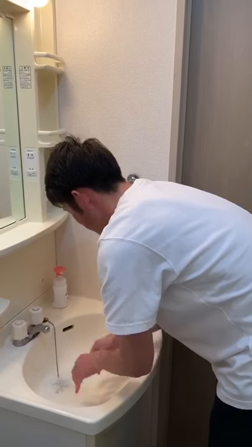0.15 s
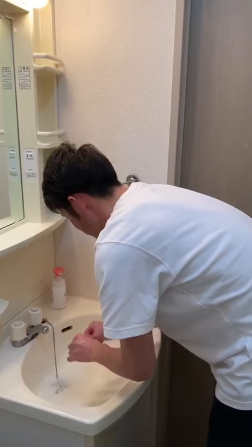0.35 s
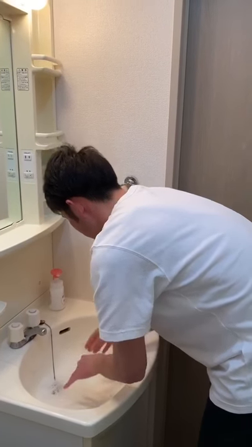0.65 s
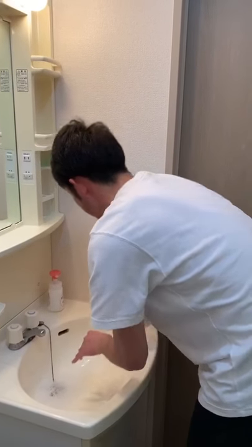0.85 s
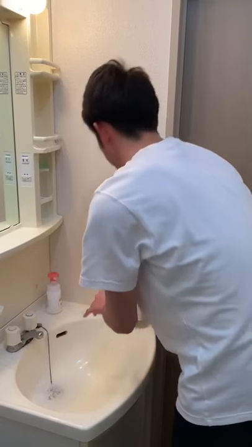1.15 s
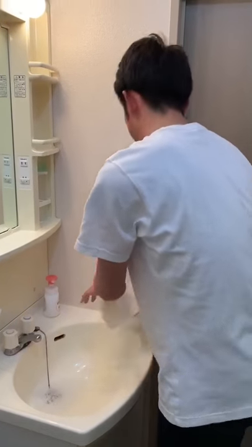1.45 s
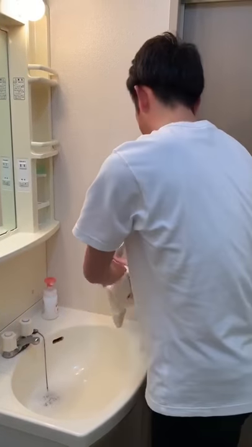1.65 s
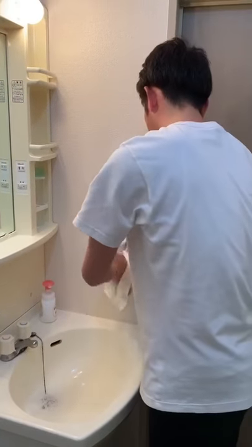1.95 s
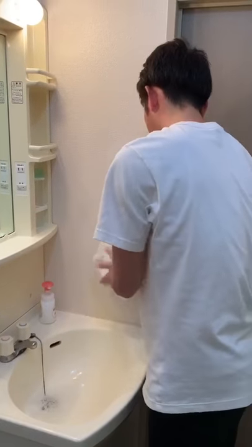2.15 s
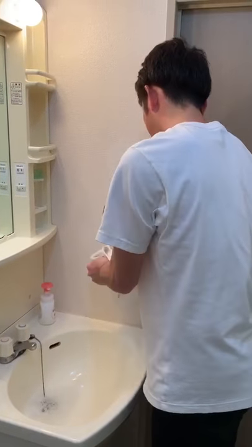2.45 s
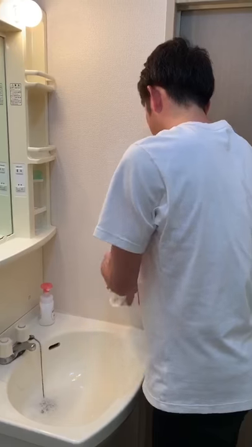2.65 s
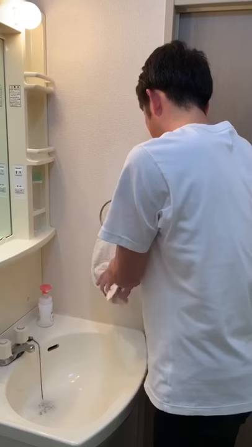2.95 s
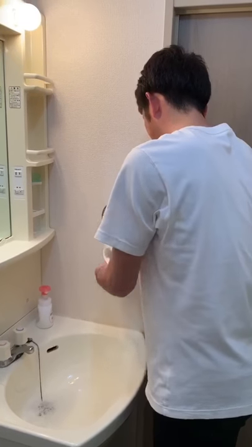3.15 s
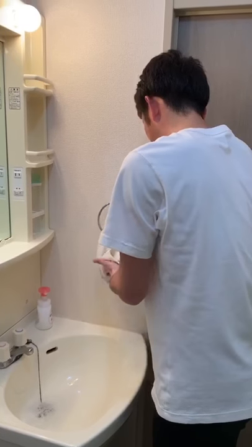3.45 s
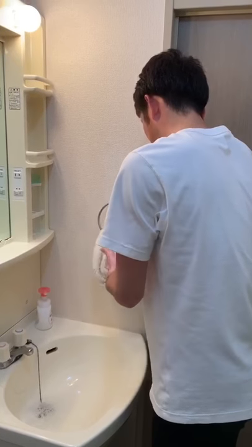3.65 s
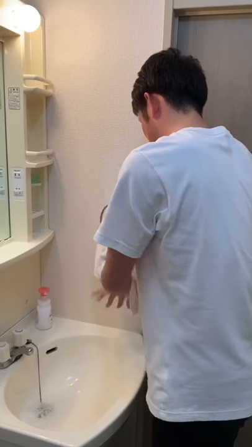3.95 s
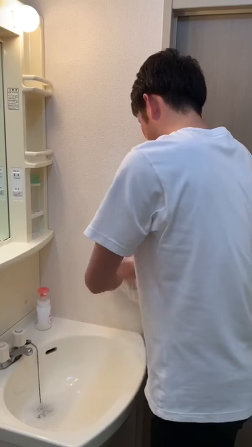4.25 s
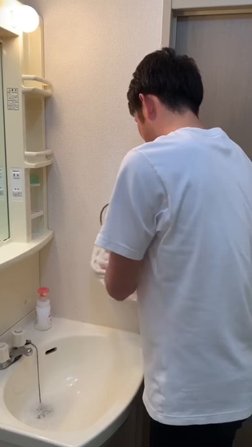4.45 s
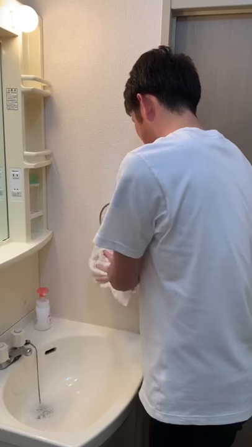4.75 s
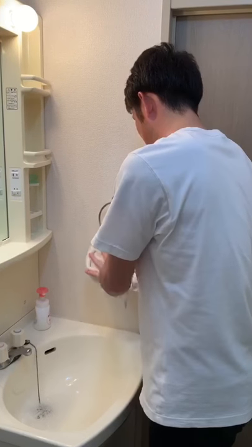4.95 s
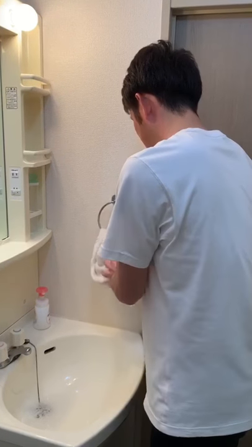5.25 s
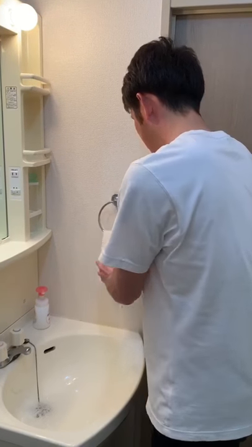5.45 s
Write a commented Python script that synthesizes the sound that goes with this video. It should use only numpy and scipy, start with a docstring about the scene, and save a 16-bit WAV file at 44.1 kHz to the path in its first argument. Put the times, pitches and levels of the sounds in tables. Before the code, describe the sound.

Close stereo pickup of hand drying: drumming drops and spray on a washbasin during the first second, a couple of small drips, then a sharp pat and ringing double clack as the towel is pulled. Irregular muffled flaps, rubs and light brushing follow to the end, with dull booms and small squeaks from the ring, in short bathroom echo over faint low room air.

```python
"""Wet hands and a towel

Wet hands are shaken over a hollow washbasin in a small bathroom, then dried on a towel.
Drops excite the damped modes of the bowl, and spray hisses over it as coloured random clicks.
The towel is pulled from its ring, which knocks on the wall: clusters of close modes that beat.
Hands pat and rub the cloth (shaped bursts of noise) amid soft low thumps (damped sines) and still air."""
import sys
import numpy as np
from scipy import signal
from scipy.fft import rfft, irfft
from scipy.io import wavfile
from scipy.ndimage import uniform_filter1d

SR = 44100
rng = np.random.default_rng(int(sys.argv[2]) if len(sys.argv) > 2 else 0)


def digitize_waveform(pressure):
    """Quantize a signal to 16-bit integers and store it at the path in sys.argv[1].

    Rows of a 2-D input are taken as channels; values are limited to [-1, 1].
    """
    field = np.atleast_2d(pressure).T
    bounded = np.clip(field, -1, 1)
    quanta = np.round(bounded * 32767).astype(np.int16)
    wavfile.write(sys.argv[1], SR, quanta)


N = 247842
TIME, HZ = np.arange(N) / SR, np.fft.rfftfreq(N, 1 / SR)
AGE = TIME[:SR // 2]  # time since the start of a short sound, in s

# Spectrum of the still air: pitch_hz, level_db
AIR_COLOUR = [(20, -1.5), (50, 30.5), (80, 26), (190, 20.5), (300, 10.5), (500, 1), (1000, 3), (2000, 0.5),
              (4000, -2), (8000, -3), (12000, -2.5), (14200, -0.5), (14800, -24)]
AIR_DB = -72.5

# Fine spray flicked off the fingers: start_s, rise_s, level_db, fade_db_per_s
FLICKS = [(0.05, 0.043, -64, 272), (.46, 0.032, -56, 327)]
FLICK_START_DB = -9.5  # against the full swell
# Spectrum of the spray: pitch_hz, level_db
SPRAY_COLOUR = [(150, -3.5), (500, -8), (1100, -4), (1800, -2), (3000, -5.5), (5000, -5.5), (7500, -8),
                (9000, -8.5), (11500, -0.5), (14000, 5), (15000, -9)]

# Single drops landing on the bowl: start_s, level_db, hardness_db (on the high modes and the splat)
DROPS = [(.073, -47, 6.5), (0.088, -43.5, 3), (0.106, -37, 2.5), (0.153, -48, .5), (0.181, -50.5, 13),
         (.195, -41.5, 5.5), (0.214, -41, -10), (0.982, -48, 0), (1.002, -44, 5.5), (1.022, -51, 9.5)]
# Showers of further drops shed by each shake: start_s, end_s, mid_level_db, hardness_db
SHAKES = [(0.119, 0.234, -46.5, 6.5), (0.917, 1.074, -48.5, 1.5)]
DROP_GAP_S, SHOWER_EDGE_DB = .019, -4.5
# Modes of the hollow bowl: pitch_hz, level_db, t60_s
BOWL_MODES = [(82.4, 5.5, 0.19), (177.8, 6.5, 0.094), (221, -8, 0.14), (297, -16.5, 0.22), (376, -20, 0.14),
              (559, -11, 0.13), (663, -19.5, 0.14), (871, -19.5, 0.13), (1000, -15, 0.19),
              (1330, -14, 0.086), (1421, -18, 0.046), (1650, -28, 0.14)]
# Spectrum of a drop's splat: pitch_hz, level_db
SPLAT_COLOUR = [(200, -3), (700, 5.5), (1450, 8), (1900, -10), (2400, -5), (4000, -12), (9000, -37)]

# Single drips and small ticks: start_s, level_db, pitch_hz, t60_s (shortest ones are lengthened in tones)
DRIPS = [(.4952, -37.5, 1764, 0.014), (.4956, -47.5, 2440, 0.026), (.5752, -41.5, 2310, 0.0092),
         (1.305, -59.5, 3000, 0.011), (1.3215, -55.5, 2250, 0.0065), (1.3225, -55.5, 4500, 0.0028),
         (1.448, -55, 2810, 0.0057), (1.483, -42.5, 2320, 0.0024), (1.484, -58, 4160, 0.0028)]

# Skin sliding along the towel: top_speed_s, half_length_s, hiss_db, brush_db
SLIDES = [(1.19, 0.068, -66.5, -68), (1.574, 0.046, -55, -52), (1.82, 0.15, -71.5, -71.5),
          (2.406, 0.12, -69.5, -63), (2.771, 0.058, -67.5, -72), (2.958, 0.084, -62.5, -59),
          (3.705, 0.058, -68.5, -63.5), (4.203, 0.084, -64.5, -56), (4.876, .06, -68.5, -64.5),
          (5.243, 0.11, -69.5, -71), (5.401, 0.1, -68, -62.5), (5.61, 0.077, -62.5, -61.5)]
SLIDE_RUB_DB = -6  # rubbing against the brushing of a slide
# Hands gripping and working the towel: start_s, hold_s, flap_db, rub_db, brush_db
GRIPS = [(1.277, 0.047, -48.5, -77, -73), (1.341, 0.1, -46, -62.5, -70), (1.526, .05, -34.5, -45.5, -43),
         (1.625, 0.1, -39.5, -58, -65), (1.761, 0.13, -39, -51.5, -66), (2.053, 0.037, -49, -73.5, -91),
         (2.131, 0.041, -43.5, -64, -75), (2.237, 0.028, -37, -51.5, -69), (2.482, 0.02, -45, -61, -78),
         (2.558, 0.041, -38.5, -52.5, -77), (2.726, 0.079, -38, -49.5, -55.5),
         (2.889, 0.054, -40, -52, -67), (3.077, 0.041, -35.5, -45, -69), (3.223, 0.08, -64, -70, -77.5),
         (3.347, 0.081, -40.5, -55, -63.5), (3.725, 0.03, -39, -54.5, -75), (3.783, 0.1, -35.5, -49, -71),
         (3.983, 0.16, -43.5, -58, -72.5), (4.134, 0.12, -34, -48.5, -61), (4.267, 0.069, -43, -51, -61.5),
         (4.388, 0.098, -45.5, -71.5, -92), (4.47, 0.12, -41, -56.5, -70),
         (4.631, 0.042, -37.5, -41.5, -51), (4.695, 0.098, -38.5, -51.5, -67),
         (4.946, 0.037, -40.5, -63, -87), (5.128, 0.026, -40, -62, -67.5), (5.219, 0.065, -45, -61.5, -74)]
GRIP_RISE_S, FLAP_RISE_S = 0.0038, 0.011  # the fibres answer at once, the heavy folds later
FLAP_FADE_DB_PER_S, RUB_FADE_DB_PER_S, BRUSH_FADE_DB_PER_S = 153, 193, 160.5
# Spectrum of the flapping folds: pitch_hz, level_db
FLAP_COLOUR = [(25, -28), (42, -14.5), (55, -6), (85, -3), (108, 4), (135, -2.5), (165, 1), (210, 0.5),
               (260, -5.5), (310, -17.5), (370, -32), (600, -41), (1200, -74)]
# Spectrum of pressed rubbing: pitch_hz, level_db
RUB_COLOUR = [(150, -7), (380, -3.5), (520, 2.5), (850, -2), (1100, -6), (1400, -7), (2400, -21.5),
              (5000, -62), (9000, -66)]
# Spectrum of light brushing: pitch_hz, level_db
BRUSH_COLOUR = [(300, -20), (700, 2.5), (1100, 5.5), (1600, 6), (2400, 3), (2900, -0.5), (3500, -8),
                (5200, -9), (6500, -22), (14000, -52)]
# Spectrum of the fibre hiss: pitch_hz, level_db
HISS_COLOUR = [(500, -13), (1500, 2.5), (3000, 2), (5000, -4.5), (6500, -5), (9000, -14.5), (12000, -9),
               (14200, -8.5), (14800, -34)]

# Hands slapping into the cloth: start_s, level_db, treble_db (against the whole), length_s
PATS = [(1.344, -41, -35, 0.057), (1.523, -21.5, -17, 0.022), (1.561, -23, -7, 0.016),
        (1.762, -32, -40.5, 0.03), (1.815, -33, -38, 0.027), (2.131, -45.5, -49, 0.048),
        (2.231, -37.5, -28, 0.031), (2.724, -33.5, -4.5, 0.024), (3.073, -35.5, -29, 0.049),
        (3.096, -35.5, -31.5, 0.046), (3.354, -40, -18, 0.058), (3.773, -34.5, -36.5, 0.086),
        (3.834, -35.5, -36, 0.044), (4.209, -27.5, -22, 0.049), (4.284, -31.5, -31.5, 0.026),
        (4.624, -25, -18.5, 0.058), (4.745, -35, -32, 0.062), (5.113, -45.5, -23, 0.027)]
# Spectrum of a usual pat: pitch_hz, level_db
PAT_COLOUR = [(150, 2.5), (350, -2), (650, 10), (850, 2), (1100, 10), (1350, 4.5), (2400, 9.5), (2900, -2),
              (3400, -2.5), (5200, -14.5), (6000, -18), (8000, -36.5), (14200, -33), (15000, -46)]

# Booms as the towel pulls taut or traps air: start_s, level_db, pitch_hz, t60_s
THUMPS = [(1.371, -35, 191, 0.069), (1.544, -32, 204, 0.28), (1.656, -35, 134.3, 0.37),
          (1.766, -35, 110.2, 0.22), (1.84, -33, 88, 0.12), (2.251, -34.5, 200, 0.12),
          (2.285, -31, 184.4, 0.083), (2.494, -41, 116, 0.46), (2.755, -39, 209.5, 0.25),
          (2.927, -36, 163.5, .2), (3.103, -29, 114, 0.082), (3.383, -35, 180.3, 0.19),
          (3.795, -33, 223, .21), (3.82, -34.5, 55.2, 0.52), (4.15, -32, 131.6, 0.25),
          (4.237, -33.5, 213, 0.14), (4.715, -29, 211, 0.1), (4.964, -37, 208, 0.21), (5.15, -32, 198, .16)]

# The towel ring meeting the wall: start_s, level_db
KNOCKS = [(1.526, -33.5), (1.562, -23.5)]
# Mode clusters of the ring and its hanger: pitch_hz, width_hz, level_db, t60_s
RING_CLUSTERS = [(1083, 14, -18, 0.35), (1460, 170, -5.5, 0.46), (1532, 113, 1, 0.33),
                 (2070, 154, -1.5, 0.45), (2180, 110, -11, 0.54), (2860, 35, -4.5, 0.12),
                 (2990, 117, -5, 0.34), (3540, 260, -35, 0.24), (3800, 240, -19, 0.35),
                 (4026, 130, -14, 0.49), (4260, 173, -1.5, 0.065), (5250, 200, -11.5, 0.28),
                 (5800, 180, -16, 0.2), (6760, 340, -17, 0.098)]
# Squeaks and hums of ring and hanger as the towel tugs: start_s, level_db, pitch_hz, width_hz, t60_s
SQUEAKS = [(1.777, -47, 668, 40, 0.16), (2.729, -44.5, 1990, 45, 0.32), (2.729, -33.5, 1048, 70, 0.044),
           (2.75, -43, 683, 25, 0.16), (3.081, -46.5, 1583, 89, 0.11), (3.083, -48, 2310, 70, .13),
           (3.19, -50, 1923, 70, 0.067), (3.802, -39.5, 677, 25, .23), (4.026, -54.5, 2460, 1220, 0.039),
           (3.079, -44.5, 1025, 120, 0.1), (4.212, -45, 1033, 100, 0.37), (4.477, -45.5, 670, 121, 0.042),
           (4.527, -54.5, 3660, 454, 0.21), (4.527, -49.5, 1440, 248, .19), (4.582, -44, 1000, 303, 0.057),
           (4.96, -56.5, 854, 151, 0.15), (5.168, -55.5, 3610, 297, 0.29)]

# Decay of the bathroom's echoes: pitch_hz, t60_s
ROOM_DECAY = [(100, 0.16), (250, 0.74), (600, 0.25), (1500, 0.23), (3000, 0.21), (6000, 0.18),
              (14000, 0.069)]
# Resonances of the corner where the towel hangs: pitch_hz, width_hz, level_db (over the plain sound)
CORNER_MODES = [(489.5, 10, -0.5), (677.2, 14.5, 4.5), (1032, 91, -5), (1058, 7.8, 4), (1552, 14, 1),
                (1570, 10, -2.5), (2035, 3.4, 3.5), (2181, 21, 4.5), (2370, 15, 0.5), (3243, 38, 8.5),
                (3490, 97, 6), (3832, 21, 6)]
# Stereo image, likeness and phase between left and right: pitch_hz, likeness (0-1), right_phase_lag_rad
STEREO_IMAGE = [(200, .99, 0), (400, .75, .5), (700, .6, 1), (1400, .65, .2), (2100, .65, 1.9),
                (2700, .6, 1.3), (3700, .8, 2), (4500, .97, 3), (5000, .97, 3.4), (6600, .95, 6.2),
                (7400, .9, 6.5), (8500, .96, 9.3), (9300, .96, 9.6), (11100, .95, 12.6), (12600, .96, 15.5),
                (13400, .96, 15.9), (15200, .9, 18.8)]
# Level of the right channel over the left: pitch_hz, level_db
RIGHT_OVER_LEFT = [(60, 1), (200, 2.2), (500, 0), (1200, .8), (2500, .5), (5000, .2)]
EDGE_HZ = 15500


def amp(db):
    """Level law: converts decibels to an amplitude gain."""
    return 10 ** (np.asarray(db) / 20)


def evened(x):
    """Normalisation: scales a signal to rms 1."""
    return x / np.sqrt(np.mean(x ** 2) + 1e-20)


def read(points, hz):
    """Interpolation: reads a table on a log-frequency axis."""
    f, value = np.transpose(points)
    return np.interp(np.log(hz + 1), np.log(f + 1), value)


def add(mix, s, sound):
    """Superposition: adds a sound to the mix at time s, cut at the end."""
    part = mix[..., max(round(s * SR), 0):][..., :sound.shape[-1]]
    part += sound[..., :part.shape[-1]]


def coloured(x, colour, tilt_db=0):
    """Linear filtering: gives x a spectrum, tilted in dB per octave from 700 to 5000 Hz, at rms 1."""
    size = x.shape[-1]
    hz = np.fft.rfftfreq(size, 1 / SR)
    octaves = np.log2(np.clip(hz, 700, 5000))
    return evened(irfft(rfft(x) * amp(read(colour, hz) + tilt_db * octaves), size))


def grains(per_s, spread_db, size=N):
    """Shot noise: random clicks of uneven strength, at the same instants in both channels."""
    strength = amp(spread_db * np.minimum(rng.exponential(1, size), 4))
    strength *= rng.random(size) < per_s / SR
    return strength * rng.standard_normal((2, size))


def room(x, wet_db):
    """Reverberation: adds the dense echoes of close hard walls, whose highest treble dies first."""
    hz, t, z = signal.stft(rng.standard_normal((2, len(AGE))), SR, nperseg=256)
    decay = amp(-60 * t / read(ROOM_DECAY, hz)[:, None])
    tail = signal.istft(z * decay, SR, nperseg=256)[1]
    tail[:, :SR // 250] = 0  # no echo in the first 4 ms
    wet = signal.fftconvolve(x, tail / np.linalg.norm(tail[0]), axes=1)[:, :N]
    return x + amp(wet_db) * wet


def stroke(start, hold, rise_s, fade_db_per_s):
    """Envelope: an attack, a hold and a release that falls evenly in dB."""
    age = np.maximum(TIME - start, 0)
    release = amp(-fade_db_per_s * np.maximum(age - hold, 0))
    return (1 - np.exp(-(age / rise_s) ** 2)) * release


def still_air():
    """Background noise: steady Gaussian noise with the spectrum of the still room."""
    return amp(AIR_DB) * coloured(rng.standard_normal((2, N)), AIR_COLOUR)


def spray(gain_db=4):
    """Random impacts: droplets tick on the bowl; each flick arrives at once, swells and thins out."""
    flicks = np.zeros(N)
    for s, rise, db, fade in FLICKS:
        swell_db = FLICK_START_DB * np.clip(1 - (TIME - s) / rise, 0, 1)
        flicks += amp(db + swell_db) * stroke(s, rise, 0.0014, fade)
    ticks = grains(per_s=4500, spread_db=2)
    return room(amp(gain_db) * flicks * coloured(ticks, SPRAY_COLOUR), wet_db=0)


def ringing(modes, scatter=0.03):
    """Modal excitation: a blow shifts the modes' pitch and sign at random; low modes build up slowly."""
    out = np.zeros((2, len(AGE)))
    for hz, db, t60 in modes:
        turns = hz * (1 + scatter * rng.uniform(-1.1, 1)) * AGE
        sign = rng.choice([-1, 1], (2, 1))
        envelope = amp(db - 60 * AGE / t60) * (1 - np.exp(-turns))
        out += sign * envelope * np.sin(2 * np.pi * turns)
    return out


def shower(start, end, db, hardness_db, jitter=.3, uneven_db=2):
    """Irregular arrivals: drops land at loose intervals, on average strongest in mid-shower."""
    late, uneven = rng.standard_normal((2, 64))
    times = np.arange(start, end, DROP_GAP_S)
    edge = (2 * (times - start) / (end - start) - 1) ** 2
    drops = []
    for s, e, a, b in zip(times, edge, late, uneven):
        level_db = db + SHOWER_EDGE_DB * e + uneven_db * b
        drops.append((s + jitter * DROP_GAP_S * a, level_db, hardness_db))
    return drops


def bowl(splat_db=-16, splat_s=0.013, spread_s=0.003):
    """Modal impact: drops spread, splat and drum on the bowl; soft ones stir mainly the low modes."""
    out = np.zeros((2, N))
    low = [mode for mode in BOWL_MODES if mode[0] < 350]
    high = [mode for mode in BOWL_MODES if mode[0] >= 350]
    drops = DROPS + [drop for shake in SHAKES for drop in shower(*shake)]
    for s, db, hardness_db in drops:
        splat = coloured(rng.standard_normal((2, len(AGE))), SPLAT_COLOUR) * np.exp(-AGE / splat_s)
        drum = ringing(low) + amp(hardness_db) * (ringing(high) + amp(splat_db) * splat)
        spreading = 1 - np.exp(-AGE / spread_s)
        add(out, s, amp(db) * spreading * drum / 2)
    return room(out, wet_db=-23.5)


def tones(rows, rise_s):
    """Damped oscillation: sines swell over rise_s and decay, equal in both channels."""
    out = np.zeros(N)
    for s, db, hz, t60 in rows:
        decay = amp(-60 * AGE / max(t60, .003))
        tone = (1 - np.exp(-(AGE / rise_s) ** 2)) * decay * np.sin(2 * np.pi * hz * AGE)
        add(out, s, amp(db) * tone / abs(tone).max())
    return np.array([out, out])


def drips():
    """Damped oscillation: single drips and ticks are very short high tones."""
    return room(tones(DRIPS, rise_s=0.00023), wet_db=-6.5)


def corner(x):
    """Resonance: walls and cabinet add a few narrow peaks."""
    peaks = sum(amp(db) / (1 + 2j * (HZ - hz) / width) for hz, width, db in CORNER_MODES)
    return irfft(rfft(x) * (1 + peaks), N)


def lumpy(x, patchy_db):
    """Stick and slip: folds catch and let go, so patches of the spectrum swell and sink."""
    z = signal.stft(x, nperseg=512)[2]
    patches = uniform_filter1d(rng.standard_normal(z.shape[1:]), size=4, axis=0)  # across frequency
    patches = uniform_filter1d(patches, size=6, axis=1)  # across time
    return evened(signal.istft(z * amp(patchy_db * evened(patches)), nperseg=512)[1][:, :N])


def handling():
    """Power summation: all grips and slides add up to gains of flapping, rubbing, brushing and hiss."""
    flap, rub, brush, hiss = np.zeros((4, N))
    for s, hold, flap_db, rub_db, brush_db in GRIPS:
        flap += (amp(flap_db) * stroke(s, hold, FLAP_RISE_S, FLAP_FADE_DB_PER_S)) ** 2
        rub += (amp(rub_db) * stroke(s, hold, GRIP_RISE_S, RUB_FADE_DB_PER_S)) ** 2
        brush += (amp(brush_db) * stroke(s, hold, GRIP_RISE_S, BRUSH_FADE_DB_PER_S)) ** 2
    for s, half_length, hiss_db, brush_db in SLIDES:
        speed = 1 / (1 + ((TIME - s) / half_length) ** 2 / 2) ** 2  # 1 at top speed
        hiss += (amp(hiss_db) * speed) ** 2
        brush += (amp(brush_db) * speed) ** 2
        rub += (amp(brush_db + SLIDE_RUB_DB) * speed) ** 2
    return np.sqrt([flap, rub, brush, hiss])


def cloth(flap_db=-7, rub_db=-8, brush_db=-6, hiss_db=-2):
    """Friction noise: folds flap, skin rubs and brushes over the towel's loops, and its fibres hiss."""
    flapping, rubbing, brushing, hissing = handling()
    flap = amp(flap_db) * flapping * coloured(rng.standard_normal((2, N)), FLAP_COLOUR)
    rub_noise = coloured(grains(per_s=1200, spread_db=1.0), RUB_COLOUR)
    rub = amp(rub_db) * rubbing * lumpy(rub_noise, patchy_db=4.0)
    brush = amp(brush_db) * brushing * coloured(grains(per_s=7000, spread_db=2.5), BRUSH_COLOUR)
    hiss = amp(hiss_db) * hissing * coloured(grains(per_s=20000, spread_db=3.0), HISS_COLOUR)
    return room(flap, wet_db=-16.5) + room(corner(rub + brush), wet_db=-8) + hiss


def pats(gain_db=-11, rise_s=0.0067, softening=0.025, brightening=0.5, usual_treble_db=-25):
    """Impact noise: a pat is a burst of crushed fibres; a brisk one is brighter and starts more sharply."""
    out = np.zeros((2, N))
    for s, db, treble_db, length in PATS:
        brisk = treble_db - usual_treble_db
        clicks = grains(per_s=9000, spread_db=2.5, size=len(AGE))
        crush = coloured(clicks, PAT_COLOUR, tilt_db=brightening * brisk)
        swell = 1 - np.exp(-AGE / (rise_s * np.exp(-softening * brisk)))
        add(out, s, amp(db + gain_db) * crush * swell * np.exp(-2 * AGE / length))
    return room(corner(out), wet_db=-8.5)


def thumps(gain_db=-3):
    """Damped low resonance: air pushed by the towel booms briefly in the small room."""
    return room(amp(gain_db) * tones(THUMPS, rise_s=0.0063), wet_db=-23)


def cluster(hz, width_hz, t60):
    """Beating: many close modes interfere as they die; peak 1 in each channel."""
    f = np.fft.rfftfreq(len(AGE), 1 / SR)
    noise = rfft(rng.standard_normal((2, len(AGE))))
    band = irfft(noise / (1 + (2 * (f - hz) / width_hz) ** 4), len(AGE))
    # a partly levelled envelope: the modes beat without dying out between beats
    band = band / np.sqrt(abs(signal.hilbert(band)) + 1e-12) * amp(-60 * AGE / t60)
    return band / abs(band).max(1, keepdims=True)


def towel_ring(gain_db=-2, squeak_rise_s=0.004):
    """Modal impact and friction: the ring clacks against the wall and sings on its hanger."""
    out = np.zeros((2, N))
    for s, db in KNOCKS:
        clack = sum(amp(mode_db) * cluster(hz, width, t60) for hz, width, mode_db, t60 in RING_CLUSTERS)
        add(out, s, amp(db + gain_db) * clack / abs(clack).max())
    for s, db, hz, width, t60 in SQUEAKS:
        swell = 1 - np.exp(-AGE / squeak_rise_s)
        add(out, s, amp(db) * cluster(hz, width, t60) * swell)
    return room(out, wet_db=-11)


def stereo_image(x):
    """Coherence and phase: the channels share the bass; higher up the right is turned in phase."""
    f, likeness, lag = np.transpose(STEREO_IMAGE)
    same, turn = np.interp(HZ, f, likeness), np.exp(-1j * np.interp(HZ, f, lag))
    left, other = rfft(x)
    right = turn * (same * left + np.sqrt(1 - same ** 2) * other)
    return irfft(np.array([left, right]), N)


def scene():
    """Superposition: water, towel and still air; thumps and drips bypass the stereo phase turn."""
    turned = still_air() + spray() + bowl() + cloth() + pats() + towel_ring()
    return stereo_image(turned) + drips() + thumps()


def record(dry):
    """Linear filtering: the right channel has a little more bass; then a low-pass limits the band."""
    right_db = read(RIGHT_OVER_LEFT, HZ)
    heard = irfft(rfft(dry) * amp(np.array([-right_db, right_db]) / 2), N)
    low_pass = signal.firwin(511, EDGE_HZ, window=("kaiser", 9), fs=SR)
    return signal.oaconvolve(heard, low_pass[None], "same")


dry = scene()
out = record(dry)
digitize_waveform(out)
```